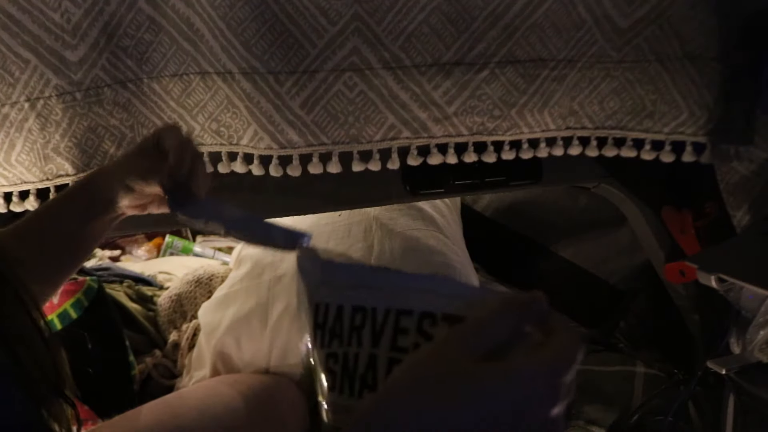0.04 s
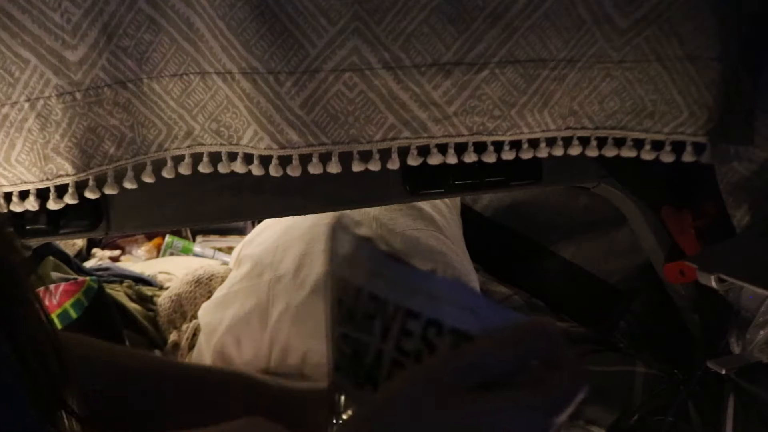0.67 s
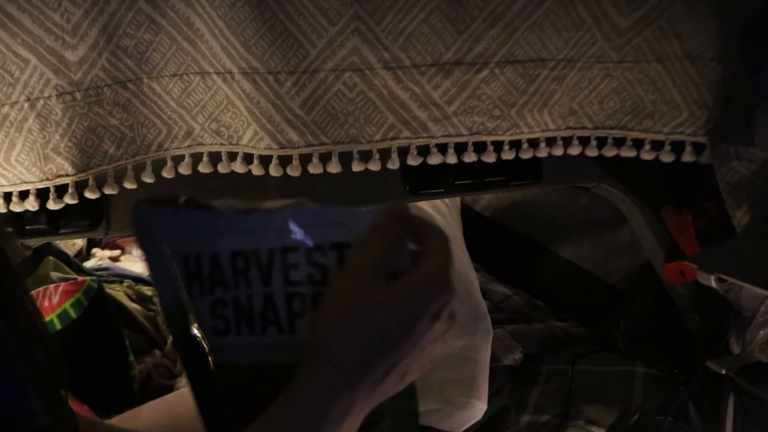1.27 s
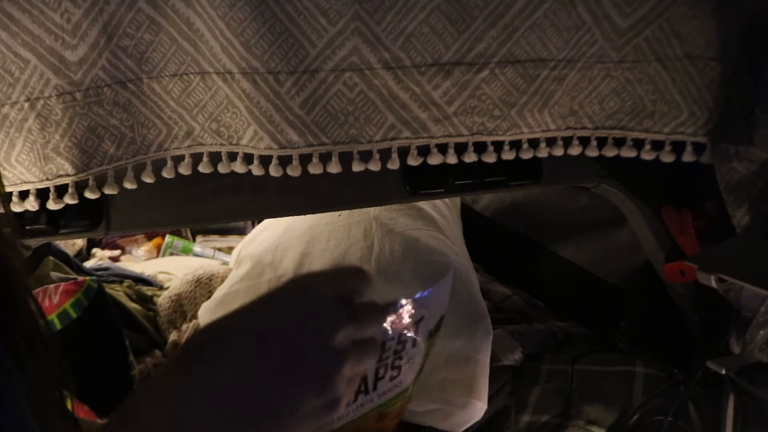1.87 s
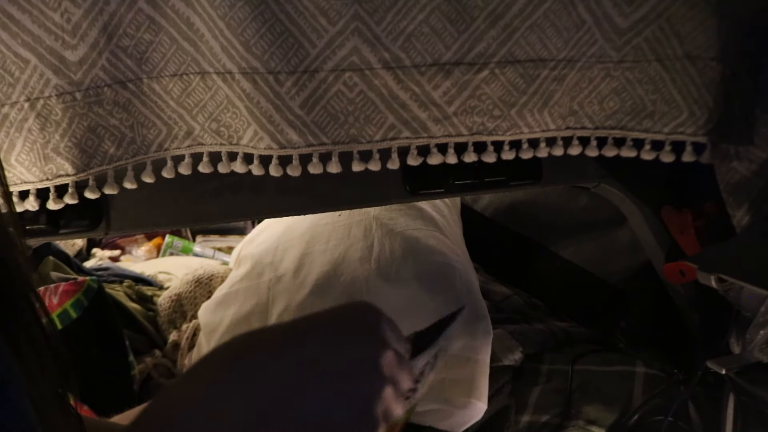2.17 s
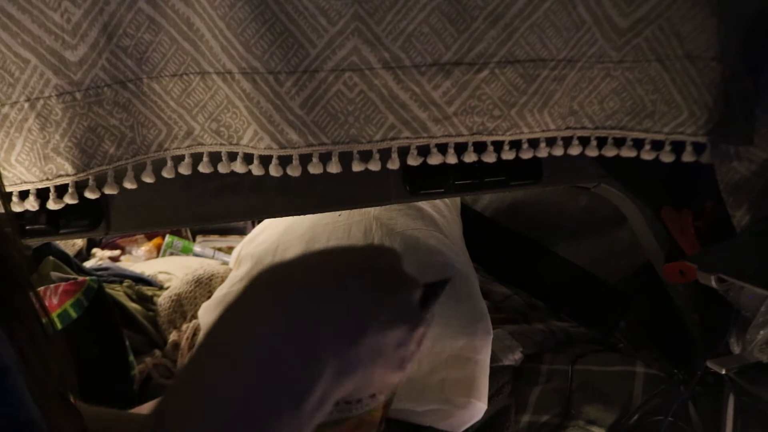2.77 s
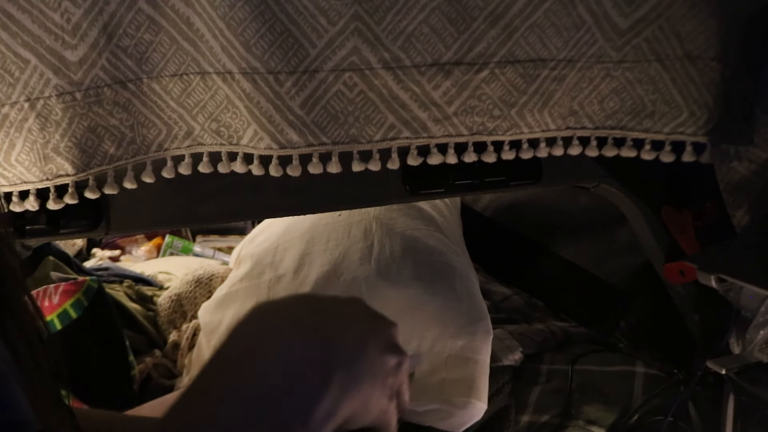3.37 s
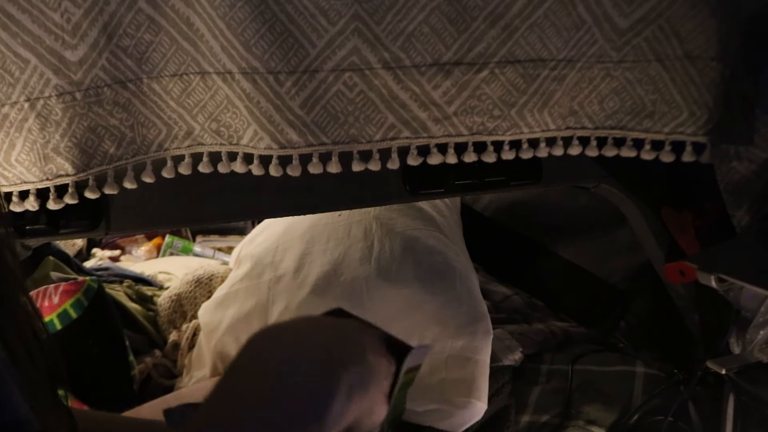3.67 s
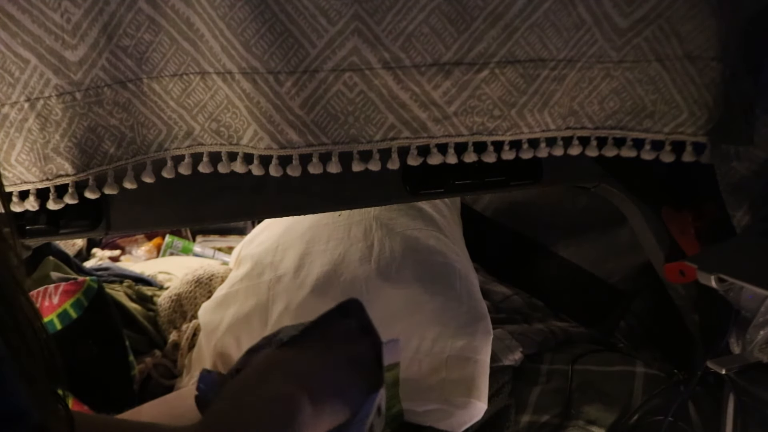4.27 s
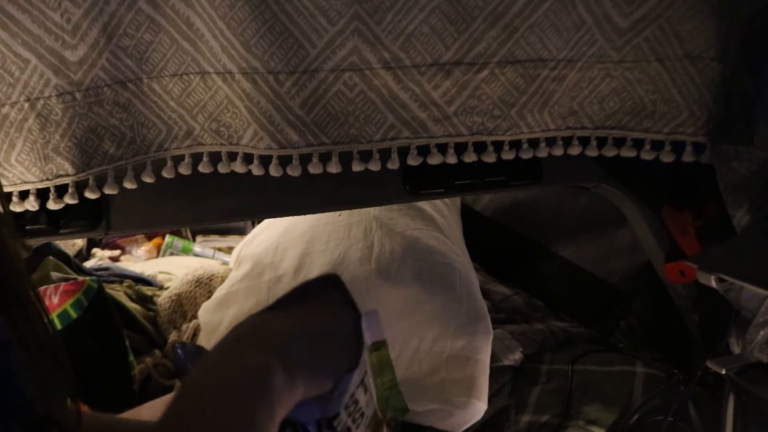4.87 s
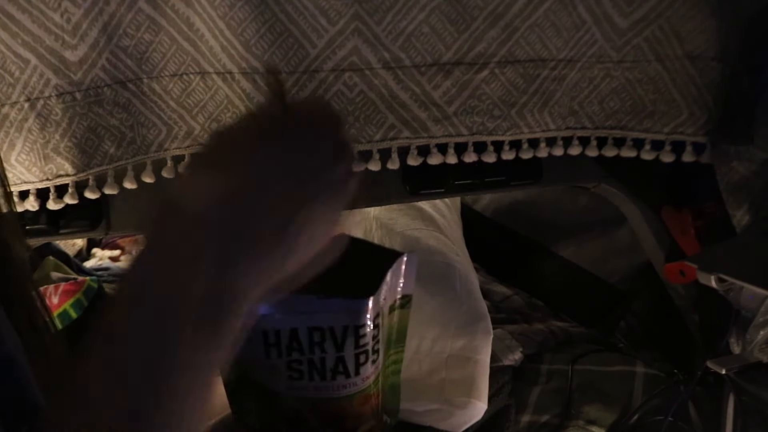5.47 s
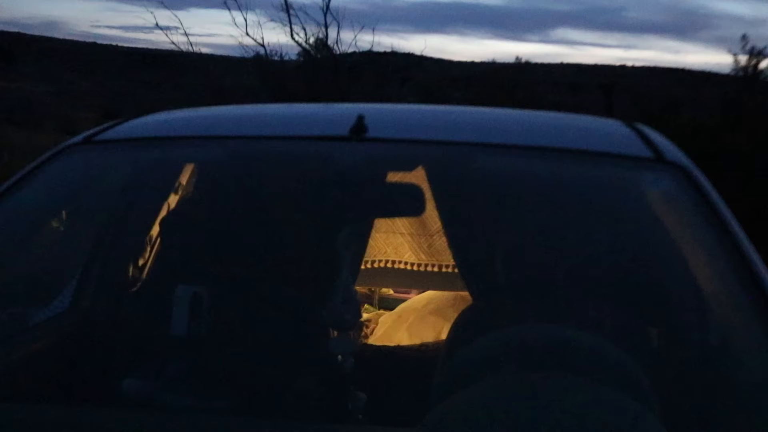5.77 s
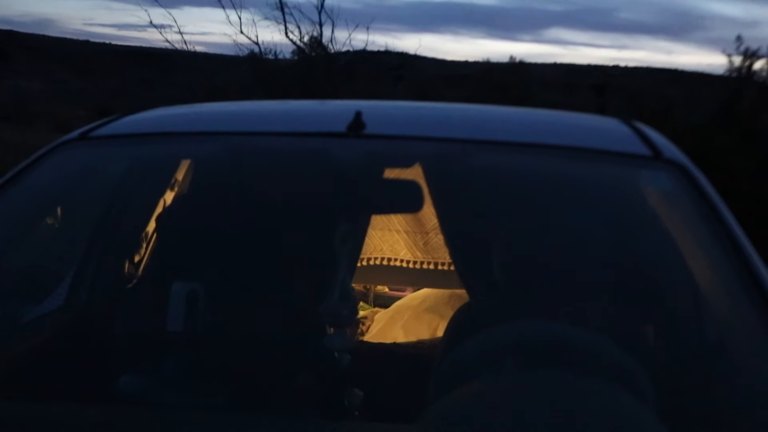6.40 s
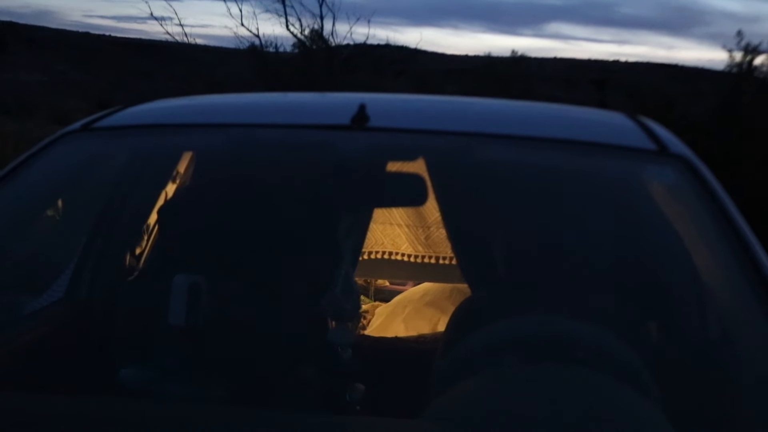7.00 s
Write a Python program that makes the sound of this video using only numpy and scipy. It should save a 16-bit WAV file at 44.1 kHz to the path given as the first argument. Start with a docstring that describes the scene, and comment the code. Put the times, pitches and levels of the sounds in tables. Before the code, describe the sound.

Close up in a parked car with almost no echo, a foil snack bag is turned over with a few sharp snaps and crinkles. After a sparser moment, a hand pulls it open and rummages inside, making dense, slightly hollow crackling, sliding hiss and soft bumps against bedding. The crinkling thins and stops. The sound then cuts to very quiet evening air outside, with faint far insects and a slight breeze.

```python
"""Rummaging in a foil snack bag

A foil bag is turned over, pulled open and rummaged in, on bedding in a parked car.
Its creases snap and crinkle as they flip; the hand slides along the foil and bumps softly.
The padded cabin hardly echoes. Near the end the scene cuts to still evening air outside,
with a faint, far hiss of insects and a slight breeze."""
import sys
import numpy as np
from scipy import signal
from scipy.fft import rfft, irfft
from scipy.io import wavfile
from scipy.ndimage import uniform_filter1d

SR = 44100
rng = np.random.default_rng(int(sys.argv[2]) if len(sys.argv) > 2 else 0)


def bounce(signal):
    """Save signal as a 16-bit WAV file at the path given by the first command-line argument."""
    frames = np.transpose(np.atleast_2d(signal))
    limited = np.clip(frames, -1, 1)
    pcm = np.round(limited * 32767).astype(np.int16)
    wavfile.write(sys.argv[1], SR, pcm)


N = 310464
TIME = np.arange(N) / SR

# The tone of the foil when it snaps: f/Hz, level/dB
SNAP_TONE = [(30, -44), (100, -20.5), (400, -11), (570, -4), (660, -14), (820, -4), (1050, -7), (1580, -1),
             (2170, -6), (2900, -1), (4700, -4.5), (7800, -8), (11000, -17.5), (16000, -30.5)]


def snap(give_s, facet_hz, weight_db, hollow_db, fizz_db, ring_s=0.027, sudden_s=0.0019, size=4096):
    """A crease flips: one sharp crack if it goes at once, a ragged run of slips if slowly."""
    t = np.arange(size) / SR
    hz = bins(t)
    # the foil swells while it slips, then rings out by 60 dB in ring_s
    run_s = 2 * max(give_s - 0.0014, 0)
    swell_db = -60 * np.maximum(t - run_s, 0) / ring_s - 5 * np.maximum(1 - t / (run_s + 1e-5), 0)
    slips_db = 1.5 * unit(uniform_filter1d(rng.standard_normal(size), size=30))
    ring = unit(spread(rng.standard_normal((2, size)) * from_db(swell_db + slips_db)))
    # the crack reaches one ear a moment before the other
    lag = rng.uniform(-0.66, 1) * np.array([[1], [-1]])
    crack = unit(np.sinc(np.arange(size) - 8 + lag)) * rng.choice([-1, 1])
    crack_share = np.clip(1 - give_s / sudden_s, 0.02, 0.9)
    flip = np.sqrt(crack_share) * from_db(4) * crack + np.sqrt(1 - crack_share) * ring
    tone = [(250, weight_db / 2 - 0.5), (950, weight_db), (1650, hollow_db),
            (3000, 0.0034), (4400, 0), (7500, fizz_db)]
    # the facet rings at one main pitch, which draws energy from nearby ones, and at chance lesser ones
    widths_away = np.log2((hz + 1) / facet_hz) / 0.098
    main_db = 8.5 * (1 / (1 + widths_away ** 2) - 0.057 / (1 + (widths_away / 5) ** 2))
    ripple = uniform_filter1d(rng.standard_normal(len(hz)), size=40)
    lesser_db = 2.5 * unit(uniform_filter1d(ripple, size=25))
    return unit(colour(flip, read(SNAP_TONE, hz) + read(tone, hz) + main_db + lesser_db))


# The creases that stand out. A facet is the small flat patch of foil that flips.
# t/s, relative level/dB, time to give way/s, facet pitch f/Hz, low-end weight/dB, high fizz/dB
SNAPS = [(0.0214, -22, 0.015, 2910, 7, -15), (.039, -20, 0.0007, 2900, -19, 0),
         (0.06, -29, 0.0013, 3970, 0, -1), (0.075, -27.5, 0.00099, 3930, -13, 5.5),
         (0.117, -34.5, 0.0045, 2610, 4, -23), (0.2107, -16, 0.0017, 3020, 9.5, 4.5),
         (.2383, -24, .0004, 3920, -17, -1), (0.2387, -19, .004, 4030, 1.5, 4),
         (0.2593, -19.5, 0.0021, 4060, 6, -2), (0.2627, -17, 0.0045, 1940, 2.5, 6.5),
         (0.3149, -20, .0016, 2450, -7.5, -7), (0.369, -19.5, 0.0011, 3600, -2, 5.5),
         (0.4016, -38.5, 0.0018, 2780, -2, -24), (.427, -35.5, 0.0019, 1790, 14, -18),
         (.4717, -19, 0.0012, 2700, 2, -5), (0.5076, -35, 0.0015, 1620, 13, -14),
         (.6325, -36, 0.0016, 7640, 2.5, 4), (0.8325, -39.5, 0.0013, 4000, 9, 2),
         (.8716, -16, 0.001, 2600, -3.5, -9.5), (1.244, -24.5, 0.0029, 1053, 11, -5),
         (1.364, -28, 0.0019, 1440, 12.5, -10.5), (1.4372, -32, 0.00064, 5550, -4, -3),
         (1.4671, -23.5, 0.0031, 1580, 5, -9.5), (1.8533, -37, 0.0034, 1480, 19, -2),
         (1.898, -37.5, 0.0061, 2440, 2, 3), (1.9366, -25, 0.0029, 1800, 9.5, -14),
         (1.955, -28, 0.0032, 5800, -2, -6), (1.9991, -30, 0.003, 2700, 8, 5),
         (2.076, -27.5, .0025, 3700, -8, 1.5), (2.1668, -31.5, 0.0027, 2900, 0, -12),
         (2.221, -36, 0.0022, 3420, 1, -25), (2.234, -34.5, 0.0029, 2970, 3, -8),
         (2.269, -22.5, 0.0017, 6660, -2.5, 1.5), (2.301, -24, 0.0041, 1660, -16, -33),
         (2.32, -29, 0.0032, 3320, -10, -7), (2.3716, -19, 0.0015, 3980, -9, -3),
         (2.3814, -22, 0.0015, 3400, 0, 5), (2.4124, -15.2, 0.0027, 4630, -6, 4),
         (2.4472, -15.5, 0.0036, 2800, -5.5, -0.5), (2.5654, -32, 0.0041, 1840, -4, -4.5),
         (2.6181, -20.5, 0.0025, 2600, 2.5, 2.5), (2.689, -37, 0.0011, 3100, -12, -38),
         (2.729, -28, 0.0032, 2280, -6, -6.5), (2.7692, -33.5, 0.0048, 3340, 0, -7),
         (2.7915, -17.5, 0.0035, 3030, -6, -1.5), (2.8278, -27, 0.0036, 2000, -3, -15),
         (2.9121, -30, .0024, 4170, -5, -9), (2.928, -22, 0.0056, 2540, -4.5, -9.5),
         (3.0153, -24.5, 0.0026, 1850, -12.5, -6), (3.0486, -19.5, 0.0024, 3020, -4.5, 3),
         (3.084, -32.5, 0.0028, 1560, 11, -15), (3.174, -24.5, 0.0039, 1600, -10, -7.5),
         (3.2161, -29.5, 0.0023, 1710, 9, -18), (3.2375, -31, 0.0016, 2710, -2, -8),
         (3.2577, -16, 0.0024, 6900, -5.5, -1), (3.368, -21, 0.0043, 1550, -7, -13),
         (3.3797, -19.5, 0.0022, 3620, 3, 2.5), (3.388, -18.5, 0.0028, 3550, 9, 0.5),
         (3.43, -22, 0.0024, 1280, 5, 1.5), (3.471, -34.5, .002, 3500, -5, -17),
         (3.586, -28.5, 0.0027, 5150, -9, -1.5), (3.6294, -19.5, 0.0027, 3420, 0.5, -4.5),
         (3.6515, -18.5, 0.003, 3500, 1, -2), (3.737, -14.5, 0.0023, 6300, -4, 6.5),
         (3.8881, -23, 0.0027, 3400, 9, -7), (3.9562, -10.5, 0.001, 4600, -22.5, 2.5),
         (4.0117, -34.5, .0023, 2650, 3, -11), (4.0285, -20, 0.001, 5270, -9, 4.5),
         (4.0772, -28, .005, 2680, 13, -4), (4.1038, -37, .0013, 1800, 9, -11),
         (4.1194, -28.5, 0.0015, 4000, 16, -1), (4.1279, -17.5, 0.0012, 3980, -8, -4.5),
         (4.2029, -28, 0.0018, 2690, -8, -20), (4.2092, -26.5, 0.0011, 2650, -2, -3),
         (4.2728, -20, 0.001, 2940, -11.5, -3.5), (4.3025, -44, .0006, 3640, -8, 6),
         (4.3176, -33, 0.00055, 3850, 0.5, 4), (4.3412, -24.5, 0.0019, 3800, -5, -2),
         (4.3747, -41.5, 0.0057, 1640, 23, -10), (4.7362, -45.5, .003, 1080, 25, -14),
         (4.845, -35.5, 0.00065, 4030, -3, 2.5), (4.8613, -30.5, 0.0057, 870, 12.5, -5),
         (4.912, -33.5, 0.0027, 2030, 6, -15), (4.9995, -21, 0.0028, 2680, 4.5, -6.5),
         (5.7025, -47.5, .0007, 4440, -9, 0)]
# The bag's hollow ring, strongest with the hand deep inside: t/s, level/dB
HOLLOWNESS = [(0, 0.5), (1.9, 0.5), (2.3, 5.5), (3.7, 3), (4.0, -2.5), (5.2, -1.5)]


def creases(level_db=-9.5, middle_facet_hz=2960):
    """The creases snap one by one; lower, heavier facets sound more hollow."""
    out = np.zeros((2, N))
    for s, db, give_s, facet_hz, weight_db, fizz_db in SNAPS:
        bag_db = np.interp(s, *np.transpose(HOLLOWNESS))
        hollow_db = bag_db + 0.5 * weight_db - 1.5 * np.log2(facet_hz / middle_facet_hz)
        add(out, s, from_db(db + level_db) * snap(give_s, facet_hz, weight_db, hollow_db, fizz_db))
    return out


# Strokes of the hand over the foil:
# start t/s, length/s, relative rubbing level/dB, brightness/dB, push on the bag (added to the level)/dB
STROKES = [(0, 0.081, -27.5, 7.5, -10), (0.241, 0.037, -30, 3, -5.5), (0.316, 0.055, -39, -3, -11),
           (0.463, 0.061, -43, -6, -6), (0.604, 0.2, -55.5, 16, -16), (1.239, 0.024, -34.5, 0, -11),
           (1.332, 0.041, -39, 3, -8), (1.42, 0.063, -41.5, 1, -1), (1.527, 0.039, -41, -16, -9.5),
           (1.949, 0.071, -39, 1, -2), (2.293, 0.043, -28.5, 2, -7.5), (2.37, 0.17, -36, 4.5, -14),
           (2.798, 0.018, -35, 1, -11), (2.932, 0.097, -33, 4.5, -10), (3.15, 0.13, -35, 8, -12),
           (3.306, 0.14, -34.5, 3, -12), (3.473, 0.041, -41.5, 13.5, -17), (3.585, 0.12, -38, 11, -15),
           (3.802, 0.0092, -36.5, 11.5, -24), (3.913, 0.047, -35, 8, -12), (4.022, 0.0073, -38, 10, -12),
           (4.077, 0.056, -40.5, 3, -4), (4.219, 0.012, -52, -6, 11.5), (4.282, 0.05, -44, -6, -9),
           (4.83, 0.055, -40.5, 3.5, -9), (4.974, 0.069, -31, 8, -16.5), (5.059, 0.1, -33, 6, -8)]
# Between strokes the hand still grips the bag, harder while rummaging: same columns
GRIPS = [(0, 5.25, -56.5, 8, -3), (2.132, 2, -45.5, 4.5, -5), (4.386, 0.82, -53, -14, -7)]


def hand(attack_s=0.011, release_s=0.018, settle_s=0.023):
    """Strokes and grips swell, hold and die away; the pushed bag and bedding settle more slowly."""
    t = np.linspace(0, N / SR, 5000)
    start, length, db, bright_db, push_db = np.transpose(STROKES + GRIPS)[:, :, None]
    before, after = np.maximum(start - t, 0), np.maximum(t - start - length, 0)
    rub = from_db(db) * np.exp(-np.minimum(before / attack_s + after / release_s, 20))
    bump = from_db(db + push_db) * np.exp(-np.minimum(before / attack_s + after / settle_s, 20))
    treble = rub * from_db(bright_db)
    powers = [(x ** 2).sum(0) for x in (rub, bump, treble)]
    rub_db, bump_db, treble_db = (np.interp(TIME, t, 10 * np.log10(power)) for power in powers)
    return rub_db, bump_db, treble_db - rub_db


def crinkles(rub_db, ring_s=0.024, facets=12, size=1024):
    """Swarms of tiny buckles thin to single ticks as the hand rests; each facet has its own pitch."""
    t, out = np.arange(size) / SR, np.zeros((2, N))
    ticks_per_s = 380 * from_db(0.43 * (rub_db + 35))
    for facet_hz in np.geomspace(1000, 7000, facets):
        strengths = from_db(3.5 * np.minimum(rng.exponential(1, N), 3)) / np.sqrt(ticks_per_s)
        ticks = (rng.random(N) < ticks_per_s / facets / SR) * strengths
        ring = rng.standard_normal((2, size)) * from_db(-60 * t / ring_s)
        ring[0, 0] += 4  # the sharp start of the tick
        octaves_away = np.log2((bins(t) + 1) / facet_hz)
        ring = colour(ring, 8 * np.exp(-(2 * octaves_away) ** 2))
        out += signal.oaconvolve(ticks[None], unit(ring), axes=1)[:, :N]
    return unit(out)


# The tone of the foil when it is rubbed: f/Hz, level/dB
RUB_TONE = [(60, -43), (250, -7.5), (500, -4), (680, -7.5), (880, 0), (1080, -6), (1600, -2), (2150, -7.5),
            (2850, -4), (4500, -13.5), (7900, -18), (11000, -29), (16000, -42)]


def rubbing(rub_db, bright_db, level_db=-2, slide_db=-5, catch_db=3, treble_hz=4500):
    """Fingers slide and catch on the foil: crinkles over an uneven hiss, both following the hand."""
    hz = bins(TIME)
    slide = from_db(slide_db) * unit(rng.standard_normal((2, N)) * from_db(catch_db * wander(per_s=66)))
    rub = unit(colour(spread(crinkles(rub_db) + slide), read(RUB_TONE, hz)))
    treble = irfft(rfft(rub) * (1 - 1 / (1 + (hz / treble_hz) ** 4)), N)
    rub = rub + treble * (from_db(bright_db) - 1)
    return rub * from_db(level_db + rub_db)


# The dull tone of the bag and bedding when pushed: f/Hz, level/dB
BUMP_TONE = [(25, -27), (48, -13), (90, -3.5), (130, -5.5), (175, -0.5), (240, -5.5), (380, -4.5),
             (700, -18.5), (2000, -39)]


def bumping(bump_db, level_db=-3, lumpy_db=2.5):
    """The hand pushes the bag's contents and the bedding, which give a dull, lumpy rumble."""
    pushes = spread(rng.standard_normal((2, N))) * from_db(lumpy_db * wander(per_s=25))
    return unit(colour(pushes, read(BUMP_TONE, bins(TIME)))) * from_db(level_db + bump_db)


# The bag knocks softly against hand or bedding: t/s, relative level/dB
THUMPS = [(.078, -46), (.259, -38.5), (1.255, -44), (4.072, -42.5), (5.001, -39)]


def thumps(level_db=-1.5, rise_s=0.0019, decay_s=0.076, size=4096):
    """Each knock pushes a dull puff of air from the bag, soon soaked up by the bedding."""
    t, out = np.arange(size) / SR, np.zeros((2, N))
    envelope = from_db(-60 * t / decay_s) * np.minimum(t / rise_s, 1)
    for s, db in THUMPS:
        puff = spread(rng.standard_normal((2, size))) * envelope
        add(out, s, from_db(db + level_db) * unit(colour(puff, read(BUMP_TONE, bins(t)))))
    return out


def cabin_echo(sound, level_db=-23, decay_s=0.11, delay_s=0.0056, size=8192):
    """Cloth soaks up the sound: only a short, weak echo comes back from the windows."""
    t = np.arange(size) / SR
    envelope = from_db(-60 * t / decay_s) * np.clip(t / delay_s - 1, 0, 1)
    tail = unit(spread(rng.standard_normal((2, size))) * envelope) / np.sqrt(size)
    tail = colour(tail, read([(200, 13), (1500, 2), (5000, -49), (14000, -24)], bins(t)))
    return from_db(level_db) * signal.oaconvolve(sound, tail, axes=1)[:, :N]


# The tone of still air in the car: f/Hz, level/dB
CABIN_AIR = [(15, -102), (25, -11), (113, -1), (324, -2.5), (881, -5), (1150, -7), (1730, -8), (4690, -11),
             (15800, -21)]
# The tone of still evening air outside: f/Hz, level/dB
EVENING_AIR = [(15, -39), (25, -12), (184, -8), (261, -5), (316, -6.5), (352, -9), (437, -10.5), (710, -12),
               (2090, -17), (3880, -19), (4950, -20.5), (6660, -21.5), (15800, -29.5)]


def air(tone, level_db, shared):
    """Still air is a steady, soft hiss, partly shared by both ears."""
    left, right, both = rng.standard_normal((3, N))
    hiss = np.array([left, right]) + shared * both
    return from_db(level_db) * unit(colour(hiss, read(tone, bins(TIME))))


def insects(level_db=-63.5, pitch_hz=4900, half_width_hz=520):
    """A far chorus of insects blurs into one narrow, high hiss."""
    band = 1 / (1 + ((bins(TIME) - pitch_hz) / half_width_hz) ** 4)
    return from_db(level_db) * unit(irfft(rfft(rng.standard_normal((2, N))) * band, N))


# How the breeze rises and falls: t/s, level/dB
BREEZE = [(6.3, -80), (6.43, -63), (6.62, -81), (6.9, -74), (7.02, -54)]


def breeze():
    """A slight breeze brushes past with a low rumble."""
    tone_db = read([(15, 1), (55, 2), (90, -7), (300, -38)], bins(TIME))
    rumble = unit(colour(rng.standard_normal((2, N)), tone_db))
    return rumble * from_db(np.interp(TIME, *np.transpose(BREEZE)))


# How unlike the two ears are: f/Hz, level/dB of the side signal against the middle
STEREO_WIDTH = [(40, -10), (200, -20.5), (700, -11), (1500, -7), (3000, -4.5), (6000, -1.5), (12000, -0.5)]


def spread(pair):
    """Two unrelated sounds become left and right: alike in the bass, apart in the treble."""
    side = irfft(rfft(pair[1]) * from_db(read(STEREO_WIDTH, bins(pair))), pair.shape[-1])
    return np.array([pair[0] + side, pair[0] - side])


def colour(x, db):
    """Turns each frequency up or down; nothing rings ahead of a hit, so attacks stay sharp."""
    log_gain = np.log(from_db(db))
    mirrored = np.concatenate([log_gain, log_gain[-2:0:-1]])
    response = np.exp(np.conj(signal.hilbert(mirrored)))[:len(db)]
    return irfft(rfft(x) * response, x.shape[-1])


def read(points, hz):
    """Joins (Hz, dB) points along a pitch scale and gives the level at hz."""
    f, db = np.transpose(points)
    return np.interp(np.log(hz + 1), np.log(f + 1), db)


def wander(per_s):
    """A smooth random curve that changes about per_s times a second."""
    return unit(irfft(rfft(rng.standard_normal(N)) / (1 + (bins(TIME) / per_s) ** 4), N))


def bins(x):
    """The frequencies in the spectrum of x, in Hz."""
    return np.fft.rfftfreq(x.shape[-1], 1 / SR)


def from_db(db):
    """Turns decibels into a number to multiply by."""
    return 10 ** (np.asarray(db) / 20)


def unit(x):
    """Scales a sound to an average strength (rms) of 1."""
    return x / np.sqrt(np.mean(x ** 2) + 1e-20)


def add(mix, s, sound):
    """Mixes a sound in, starting at s seconds."""
    part = mix[:, max(round(s * SR), 0):][:, :sound.shape[1]]
    part += sound[:, :part.shape[1]]


def scene(cut_s=5.825, fade_s=0.019, left_db=0.38):
    """The bag in the car, a little to the left, then a quick fade to the evening outside."""
    rub_db, bump_db, bright_db = hand()
    bag = creases() + rubbing(rub_db, bright_db) + bumping(bump_db) + thumps()
    bag *= from_db([[left_db], [-left_db]])
    inside = bag + cabin_echo(bag) + air(CABIN_AIR, level_db=-54.5, shared=0.3)
    outside = insects() + breeze() + air(EVENING_AIR, level_db=-54, shared=0.4)
    place = np.clip((TIME - cut_s) / fade_s + 0.5, -1, 1)  # -1 is inside, +1 is outside
    return inside * np.sqrt(np.maximum(-place, 0)) + outside * np.sqrt(np.maximum(place, 0))


def record(dry, top_hz=16000):
    """Clips any snap that passes full scale, then removes the highest treble."""
    low_pass = signal.firwin(511, top_hz, window=("kaiser", 9), fs=SR)
    return signal.oaconvolve(np.clip(dry, -1, 1), low_pass[None], "same")


dry = scene()
out = record(dry)
bounce(out)
```